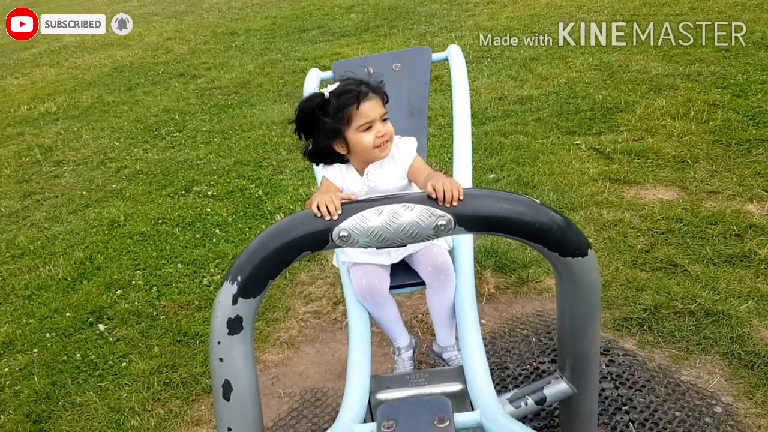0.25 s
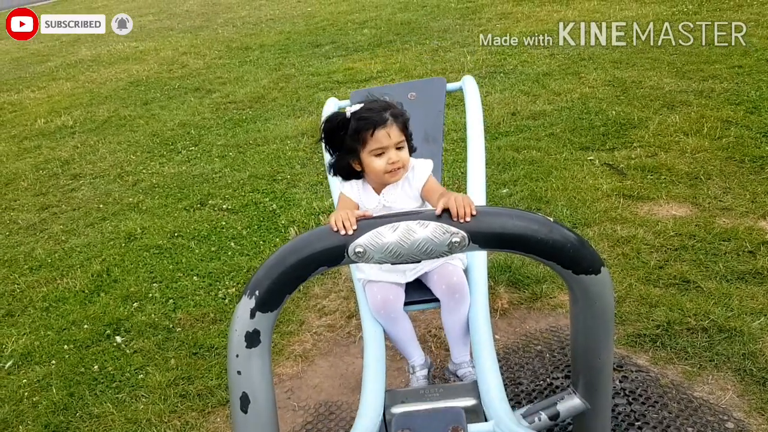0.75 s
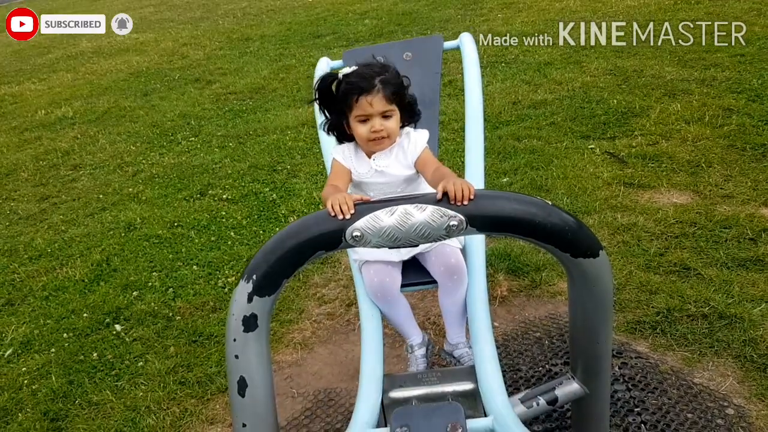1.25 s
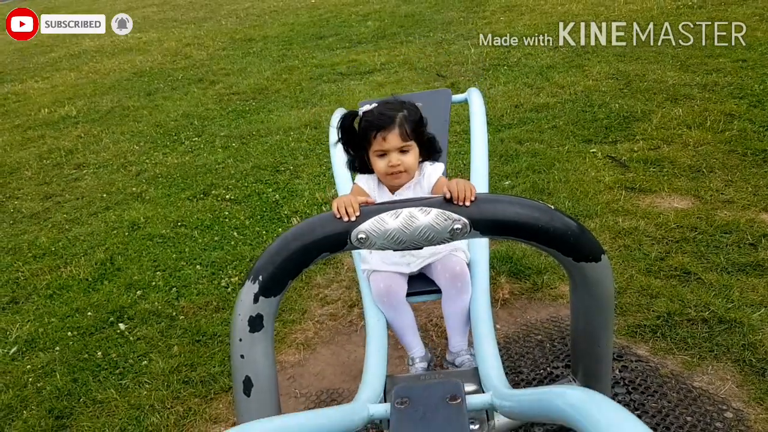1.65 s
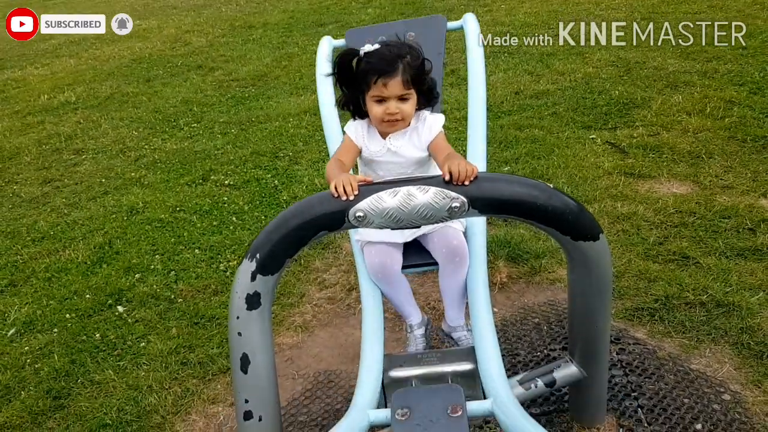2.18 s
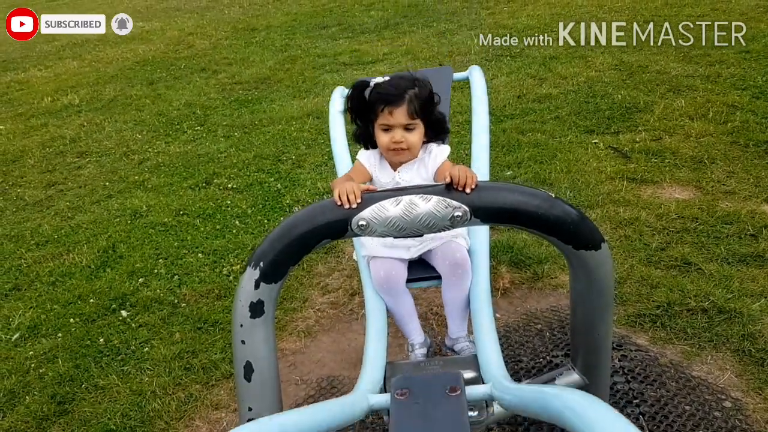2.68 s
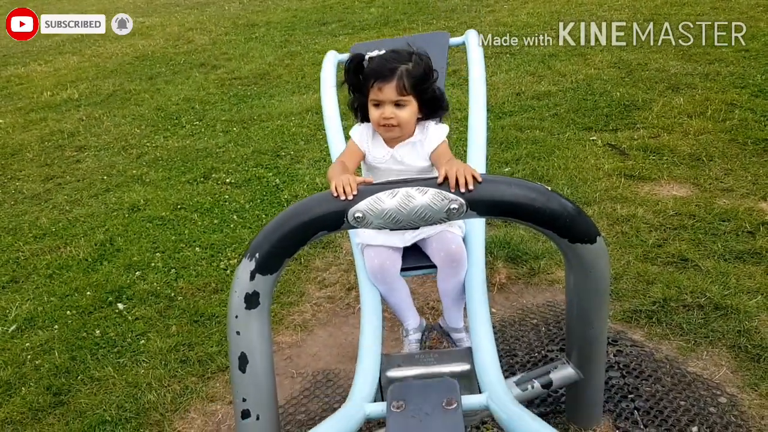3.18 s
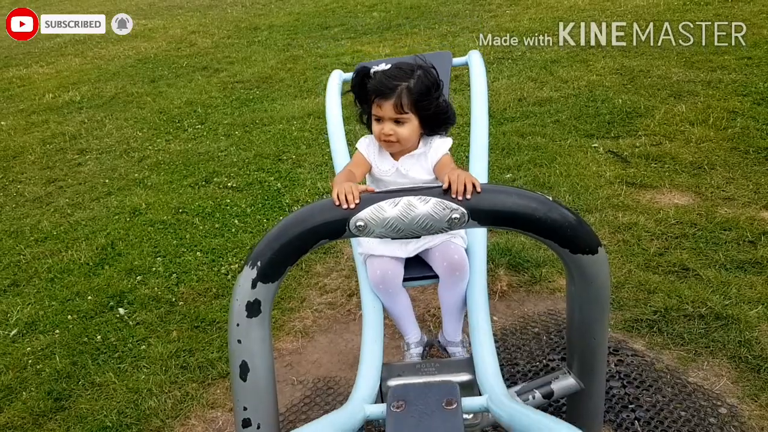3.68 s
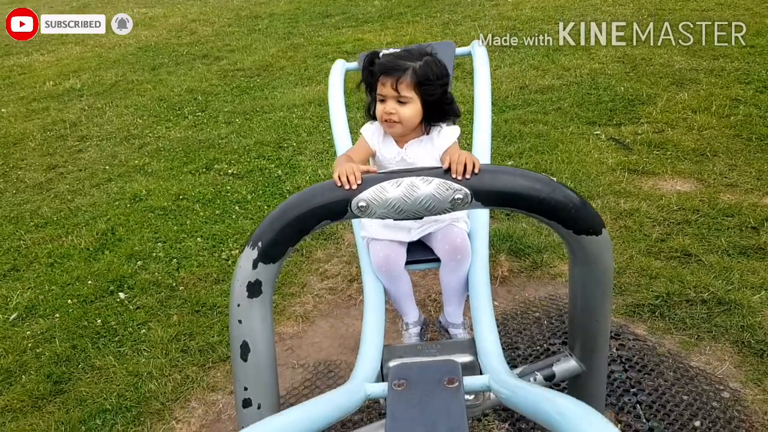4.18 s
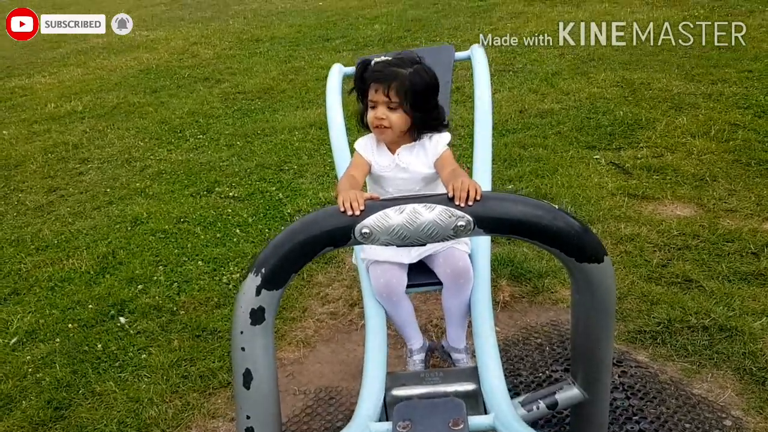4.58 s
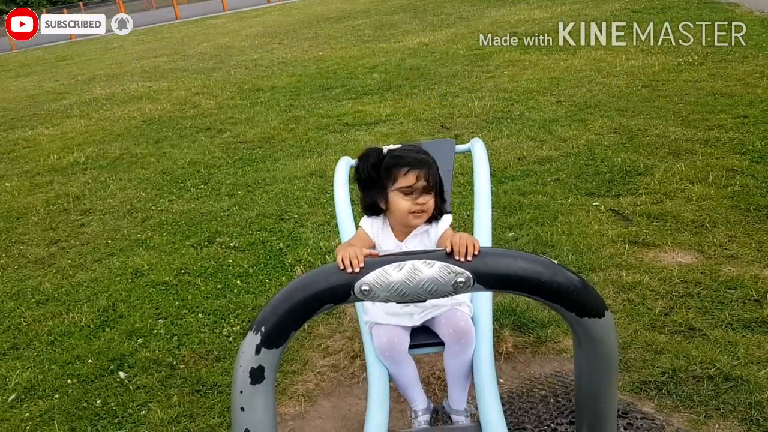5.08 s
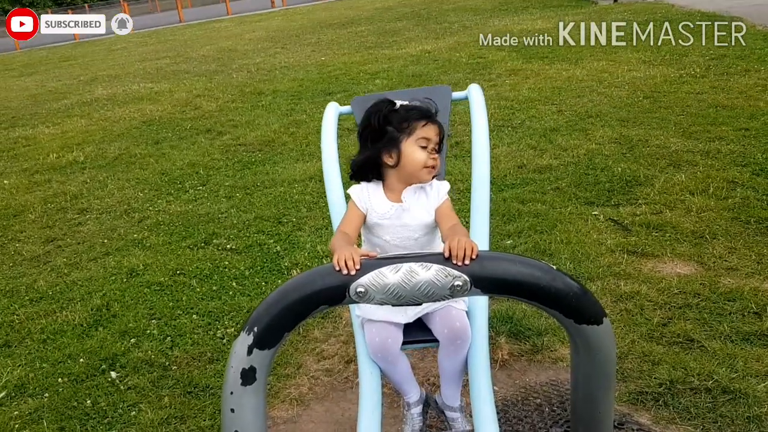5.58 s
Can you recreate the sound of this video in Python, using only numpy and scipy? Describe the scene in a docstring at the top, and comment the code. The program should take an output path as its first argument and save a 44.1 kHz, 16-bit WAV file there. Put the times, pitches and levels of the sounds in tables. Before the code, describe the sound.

High, scraping metallic squeaks repeat in a steady back-and-forth rhythm over a faint open-air hush and soft wind rumble.

```python
"""A dry metal squeak, once each way, from the pivot of a rocking seat on a lawn, close to a phone with two ports.
Stick-slip feeds a few modes of the tube frame until they sing; the chattering contact mixes them and scrapes.
The tubes ring on briefly and the seat ticks faintly.
Light wind puffs on the ports over a faint outdoor hush."""
import sys
import numpy as np
from scipy import signal
from scipy.fft import rfft, irfft
from scipy.io import wavfile
from scipy.ndimage import uniform_filter1d

SR = 44100
rng = np.random.default_rng(int(sys.argv[2]) if len(sys.argv) > 2 else 0)


def to_wav(sig):
    """Store sig (one row per channel, or 1-D mono) as 16-bit WAV at the path in sys.argv[1].

    Samples outside -1..1 are clipped; the rate is SR.
    """
    pcm = np.clip(np.atleast_2d(sig), -1, 1) * 32767
    pcm = np.round(pcm).astype(np.int16)
    wavfile.write(sys.argv[1], SR, pcm.T)  # frames by channels


N = 257984
T = np.arange(N) / SR  # seconds

# Top mode around the last cry of a forward swing: (pitch before [Hz], at the cry [Hz], after it [Hz])
CRY_HZ = (3964, 4126, 4160)
# Middle mode late in either swing: (pitch it falls from [Hz], pitch it falls to [Hz])
MIDDLE_LATE_HZ = (2382, 2304)

SILENT_DB = -120
CATCH_DB_S, LET_GO_DB_S, PETER_DB_S = 3000, 999.5, 805  # dB per s: starting, letting go, dying at the end
LOW_FALL_DB_S = 550  # dB per s
ACCENT_DB, ACCENT_S = 2.5, .035  # the middle mode catches hard, then settles
CONTACT = ("weak", "grit", "chatter")  # layers that follow the contact as a whole


def undb(db):
    """Decibels to gain."""
    return 10 ** (np.asarray(db) / 20)


def unit(x):
    """Scale to rms 1."""
    return x / np.sqrt(np.mean(np.abs(x) ** 2))


def colour(x, points):
    """Shape the spectrum by (Hz, dB) points, straight lines over log frequency, and scale to rms 1."""
    hz, db = np.transpose(points)
    f = np.maximum(np.fft.rfftfreq(N, 1 / SR), 1)
    gain = undb(np.interp(np.log(f), np.log(hz), db, left=-90, right=-90))
    return unit(irfft(rfft(x) * gain, N))


def walk(rate_hz):
    """Smooth random drift of rms 1, drawn every 32 samples."""
    lowpass = signal.butter(2, rate_hz, fs=SR / 32, output="sos")
    coarse = signal.sosfilt(lowpass, rng.standard_normal(N // 32 + 1))
    times = T[::32]
    return np.interp(T, times, unit(coarse)[:len(times)])


def pan(x, db):
    """Place between the ports; db is left minus right."""
    return x * undb(np.array([[1], [-1]]) * db / 2)


def spread(z, db, radians):
    """A phasor sent to both ports with slowly shifting balance and lag, as the seat moves."""
    lag = np.exp(1j * radians * walk(5.22) * np.array([[.5], [-.5]]))
    return (pan(z, db * walk(3.5)) * lag).real


def pivot():
    """Stick-slip at the dry bearing: singing modes, their mixing tones and the scrape."""
    level, pitch = swings()
    modes, lowest = singing_modes(level, pitch)
    singing = sum(spread(mode, 1.8, .45) for mode in modes) + lowest.real
    mixed = undb(level["chatter"]) * mixing_tones(modes)
    return np.sqrt(2) * (singing + mixed) + scrape(level)


def singing_modes(level, pitch):
    """Modes sing clean when far above the scrape, and break up when they are not."""
    # low modes: (low, highest pitch [Hz], lowest mode [Hz])
    low_hz, lowest_hz = (1765, 1387)
    ceiling_hz = 4180  # top pitch at which the low mode reaches its ceiling
    modes = []
    for name, margin_db in (("top", -3), ("high", 5), ("middle", 1)):
        hz, db = pitch[name], level[name]
        waver = undb(db + 2.2 * np.tanh(walk(19)))  # the grip comes and goes
        rough = 0.022 + undb(2 * (level["weak"] + margin_db - db))
        modes.append(waver * sing(hz * (1 + .005 * walk(30)), rough, slip_hz=110))
    # the low mode's pitch rises gently with the top mode's, up to a ceiling
    pulled_hz = low_hz * np.minimum(pitch["top"] / ceiling_hz, 1) ** .5
    modes.append(undb(level["low"]) * sing(pulled_hz, 0.15, slip_hz=30))
    lowest = undb(level["lowest"]) * sing(lowest_hz, .4, slip_hz=29.2)
    return modes, lowest


def sing(hz, rough, slip_hz):
    """A self-excited mode as a turning phasor; uneven slipping shakes its size and phase."""
    rough = np.clip(rough, 0, 1)  # share of the power that is shaken
    uneven = walk(slip_hz) + 1j * walk(slip_hz)
    shake = np.sqrt(1 - rough) + np.sqrt(rough / 2) * uneven
    return shake * np.exp(2j * np.pi * np.cumsum(hz + 0 * T) / SR)


def mixing_tones(modes):
    """Chatter mixes the singing modes; each tone grows with its parents' shares of the motion."""
    # orders of mixing: (multiple of top [1], of high [1], of middle [1], of low [1])
    orders = [(0, 0, 2, 0), (0, 1, 1, 0), (1, 0, 1, 0), (1, 0, 0, 1), (0, 0, 0, 2), (0, 2, -1, 0),
              (0, 1, -1, 0), (0, -1, 2, 0), (0, 2, 0, 0), (2, 0, 0, 0), (0, 3, 0, 0), (3, 0, 0, 0),
              (2, 0, 0, 1), (0, 2, 1, 0), (0, 1, 2, 0)]
    # one per order: level before the share and the chatter level [dB]
    order_db = [-3, 0.5, -6.5, 3.5, -8, -4.5, -17, -4.5, -20, -17, -23.5, -11.5, -3.5, -19, -29.5]
    power = sum(np.abs(mode) ** 2 for mode in modes)
    motion = np.sqrt(uniform_filter1d(power, size=400) + 1e-12)  # over about 9 ms
    log_share, phase = np.log(np.abs(modes) / motion + 1e-9), np.angle(modes)
    mixed = 0
    for order, db in zip(orders, order_db):
        tone = np.exp(0.5 * np.abs(order) @ log_share + 1j * np.array(order) @ phase)
        mixed = mixed + undb(db) * spread(tone, 0.89, 2.7)
    return mixed


def scrape(level):
    """Weaker modes, grit in the bearing, short scuffs as it grips, and a treble rasp."""
    # colour of grit and scuffs: (frequency [Hz], relative level per Hz [dB])
    grit_colour = [(350, -50.5), (600, -24), (1250, -9.5), (1450, -5), (1960, -11), (2400, -0.5),
                   (3240, -13), (3820, -5.5), (6310, -14.5), (6950, -31.5), (9890, -26.5), (14500, -41),
                   (15500, -50.5)]
    # colour of the rasp: (frequency [Hz], relative level per Hz [dB])
    rasp_colour = [(6500, -28), (7600, -2), (8600, -13), (10000, -4), (11500, -8), (12500, -7), (14500, -9),
                   (15500, -19)]
    # the bearing grips: (time, 4 ms ahead of the scuff's peak [s], level before a 7.5 dB lift [dB])
    stops = [(0.4244, -71), (1.0914, -67), (1.5873, -63.5), (2.218, -74), (2.7234, -58), (3.3344, -65),
             (3.823, -64.5), (4.984, -59.5), (5.5374, -56.5)]
    weak_db, grit_db, chatter_db = (level[name] for name in CONTACT)
    caught = weaker_modes()
    # partly shared noise, a little different at each port
    noise = rng.standard_normal(N) + .9 * rng.standard_normal((2, N))
    grit = undb(2.5 * walk(150)) * streaks(noise, depth_db=10.0)
    scuffs = sum(undb(db + 7.5) * np.exp(-((T - s - .004) / 0.01) ** 2) for s, db in stops)
    rasp_db = 0.71 * weak_db + 0.31 * chatter_db - 10.5 + 2.2 * walk(27)
    out = undb(weak_db + 8.5) * unit(caught)
    out = out + (undb(grit_db + 9.5) + scuffs) * colour(grit, grit_colour)
    return out + undb(rasp_db) * colour(grit, rasp_colour)


def weaker_modes():
    """Weaker modes of the frame catch for a moment, glide with the load and let go again."""
    # weaker modes: (frequency [Hz], level relative to each other [dB])
    weak_modes = [(834, -22.5), (1080, -18.5), (1420, -13.5), (1560, -18), (2700, -16), (2950, -22),
                  (3200, -18.5), (3480, -12.5), (4060, 0), (4380, -13), (4540, -4), (4800, -11),
                  (5390, -8.5), (5560, -13.5), (6180, -10.5), (6400, -15.5), (7300, -25.5), (8260, -30.5),
                  (9210, -23.5), (9710, -18), (10300, -17.5), (11100, -25), (12300, -21), (13800, -24.5)]
    load = walk(6)  # shared by all
    caught = 0
    for hz, db in weak_modes:
        catch = undb(db + 11 * np.tanh(1.8 * walk(19.3)))
        tone = sing(hz * (1 + .012 * load + .004 * walk(9)), .2, slip_hz=50)
        caught = caught + catch * spread(tone, 3.3, 1.95)
    return caught


def streaks(x, depth_db):
    """Countless close modes flare up one by one: narrow strips of the noise swell for a moment."""
    z = signal.stft(x, nperseg=1024)[2]
    flare = unit(uniform_filter1d(rng.standard_normal(z.shape[1:]), size=4))
    return signal.istft(z * undb(depth_db * flare), nperseg=1024)[1][:, :N]


def swings():
    """Levels in dB of every layer and pitches of the three gliding modes, from both kinds of swing."""
    db = {name: [] for name in ("top", "high", "middle", "low", "lowest", *CONTACT)}
    hz = {name: [] for name in ("top", "high", "middle")}
    forward_swings(db, hz)
    backward_swings(db, hz)
    level = {name: np.max(traces, axis=0) for name, traces in db.items()}
    pitch = {name: np.interp(T, *np.transpose(sorted(points))) for name, points in hz.items()}
    return level, pitch


def forward_swings(db, hz):
    """Middle mode opens, scrape sets in, pivot stalls, then top and low modes swell to a last cry."""
    # forward swings, levels ahead of accents, flutter and layer trims:
    # (start [s], scrape full [s], stall [s], cry [s],
    #  middle at start [Hz], middle at stall [Hz], high [Hz],
    #  middle at start [dB], at stall [dB], after stall [dB], high at start [dB], at stall [dB],
    #  top [dB], low [dB], lowest [dB], weaker modes [dB], grit [dB], chatter [dB], depth of stall [dB])
    forward = [ (0.206, 0.268, 0.32, 0.42, 2360, 2477, 3743, -37.5, -50, -48, -53, -44.5, -31.5, -40, -39, -49, -56, -47, 10.5),
               (1.326, 1.430, 1.485, 1.578, 2318, 2457, 3773, -48, -49, -46, -48, -42, -30, -41.5, -63.5, -53.5, -58, -45, 4),
               (2.506, 2.559, 2.622, 2.709, 2413, 2412, 3853, -42, -56.5, -40, -61, -44, -31.5, -44.5, -42.5, -50.5, -54, -46.5, 13.5),
               (3.618, 3.682, 3.728, 3.813, 2378, 2506, 3784, -43.5, -58.5, -41.5, -55, -49, -31, -47, -61.5, -50.5, -54, -44.5, 13),
               (4.685, 4.793, 4.875, 4.968, 2488, 2550, 3867, -47.5, -54.5, -48, -54, -47, -30.5, -39.5, -70.5, -54, -62.5, -49.5, 4.5),
               (5.82, 5.900, 5.95, 6.05, 2350, 2517, 3690, -38, -50.5, -45, -61, -50, -30, -50, -65, -53.5, -60, -42, 12),
               ]
    # build-up from the start: (weaker modes [dB], grit [dB], chatter [dB])
    opening_db = (15.5, 24.5, 7.5)
    # change at the cry: (weaker modes [dB], grit [dB], chatter [dB])
    at_cry_db = (2, -4.5, 6.5)
    stall_s, late_sag_db = .012, 9
    dip_hz, dip_s = 60.04, .05  # the high mode starts sharp, then dips
    cry_rise_db_s, low_rise_db_s = 380.5, 300.5  # dB per s
    hold_s, glide_s, low_late_s = 0.0057, .06, .012
    for (start, full, stall, cry, hz0, hz1, high_hz, mid0, mid1, mid2, high0, high1,
         top, low, lowest, *contact, depth) in forward:
        dip = depth * np.exp(-((T - stall) / stall_s) ** 2)
        opening = [(start + .006, mid0 + ACCENT_DB), (start + ACCENT_S, mid0 - ACCENT_DB),
                   (stall - stall_s, mid1)]
        after = [(stall + stall_s, mid2), (cry, mid2 - late_sag_db)]
        db["middle"] += [trace(opening, CATCH_DB_S, LET_GO_DB_S), trace(after, CATCH_DB_S, LET_GO_DB_S)]
        hz["middle"] += [(start, hz0), (full, hz1), (stall, hz1),
                         (stall + stall_s, MIDDLE_LATE_HZ[0]), (cry, MIDDLE_LATE_HZ[1])]
        points = [(start, high0), (stall - .02, high1), (cry - glide_s, high1)]
        db["high"] += [trace(points, CATCH_DB_S, LET_GO_DB_S) - dip]
        hz["high"] += [(start, high_hz + dip_hz), (start + dip_s, high_hz - dip_hz),
                       (stall, high_hz), (cry - glide_s / 2, CRY_HZ[0])]
        points = [(cry - hold_s, top), (cry + hold_s / 2, top)]
        db["top"] += [trace(points, cry_rise_db_s, LET_GO_DB_S)]
        hz["top"] += [(cry - glide_s, CRY_HZ[0]), (cry, CRY_HZ[1]), (cry + glide_s / 2, CRY_HZ[2])]
        db["low"] += [trace([(cry + low_late_s, low)], low_rise_db_s, LOW_FALL_DB_S)]
        db["lowest"] += [trace([(cry, lowest)], low_rise_db_s, LET_GO_DB_S)]
        for name, level, build, change in zip(CONTACT, contact, opening_db, at_cry_db):
            points = [(start, level - build), (full, level), (stall, level), (cry + hold_s, level + change)]
            db[name] += [trace(points, CATCH_DB_S, LET_GO_DB_S) - dip]


def backward_swings(db, hz):
    """The high mode sings, breaks up, hands over to the top mode, and the squeak peters out."""
    # backward swings, levels ahead of accents, flutter and layer trims:
    # (middle starts [s], high catches [s], high loudest [s], scrape full [s], handover [s],
    #  top lets go [s], end [s], middle at start [Hz], high [Hz], top [Hz],
    #  middle at start [dB], at handover [dB], at end [dB], high at catch [dB], loudest [dB],
    #  at handover [dB], top [dB], top near the end [dB], low [dB], lowest [dB],
    #  weaker modes [dB], grit [dB], chatter [dB], scrape builds by [dB], fades by [dB], top early by [s])
    backward = [ (0.819, 0.82, 0.87, 0.93, 1, 1.04, 1.084, 2327, 3837, 4015, -55, -50, -54, -38.5, -30.5, -44.5, -31, -52, -51.5, -60.5, -46, -58, -41.5, 14, 15, .002),
                (1.978, 1.994, 2.070, 2.085, 2.155, 2.192, 2.228, 2497, 3849, 4026, -51, -47, -64.5, -37, -29, -46, -29.5, -42.5, -54.5, -47, -46, -57.5, -41.5, 11, 13, 0.0021),
                (3.120, 3.173, 3.13, 3.216, 3.262, 3.322, 3.340, 2540, 3814, 4028, -50, -47.5, -61, -44, -35, -38.5, -29.5, -46, -54.5, -66, -44.5, -56, -42, 14.5, 11.5, 0.0023),
                (4.232, 4.298, 4.400, 4.325, 4.440, 4.505, 4.570, 2540, 3840, 4045, -49, -57, -63, -41, -34.5, -38.5, -39, -49.5, -59, -77.5, -49.5, -57.5, -43, 16, 16, .08),
                (5.375, 5.330, 5.418, 5.440, 5.487, 5.503, 5.542, 2278, 3860, 4010, -53.5, -43, -68.5, -37, -29, -49, -28, -47.5, -62, -47, -44.5, -62, -40, 21, 17, 0.0018),
                ]
    # share of the build-up: (weaker modes [1], grit [1], chatter [1])
    build_share = (1.1, 0.91, 0.12)
    # share of the fade: (weaker modes [1], grit [1], chatter [1])
    fade_share = (1.13, 1.2, .9)
    glide_hz = 30.06  # the high mode glides up from below its pitch to above it, then settles
    break_s = 0.022  # after its loudest moment the high mode loses half its drop in this time
    for (start, catch, loudest, full, hand, let_go, end, hz0, high_hz, top_hz,
         mid0, mid1, mid2, high0, high1, high2, top, tail, low, lowest,
         *contact, build, fade, early) in backward:
        points = [(start, mid0 + ACCENT_DB), (start + ACCENT_S, mid0 - ACCENT_DB), (hand, mid1), (end, mid2)]
        db["middle"] += [trace(points, CATCH_DB_S, PETER_DB_S)]
        hz["middle"] += [(start, hz0), (hand - .01, MIDDLE_LATE_HZ[0] + 30),
                         (hand, MIDDLE_LATE_HZ[0]), (end, MIDDLE_LATE_HZ[1])]
        points = [(catch, high0), (loudest, high1), (loudest + break_s, (high1 + high2) / 2),
                  (hand - .01, high2)]
        db["high"] += [trace(points, CATCH_DB_S, LET_GO_DB_S)]
        hz["high"] += [(catch, high_hz - glide_hz), (catch + .025, high_hz + glide_hz), (hand, high_hz)]
        points = [(hand - early, top - 4), (hand, top), (let_go, top - 3),
                  (min(let_go + 0.014, end - .002), tail), (end, tail - 3)]
        db["top"] += [trace(points, CATCH_DB_S, PETER_DB_S)]
        hz["top"] += [(hand - early, top_hz - 20), (hand, top_hz), (let_go, top_hz), (end + .02, CRY_HZ[1])]
        points = [(hand + .01, low - 8), (let_go, low), (end, low - 10)]
        db["low"] += [trace(points, LOW_FALL_DB_S, LOW_FALL_DB_S)]
        points = [(hand - .02, lowest - 8), (let_go, lowest), (end, lowest - 10)]
        db["lowest"] += [trace(points, LOW_FALL_DB_S, LOW_FALL_DB_S)]
        first, second = sorted((start, catch))  # the scrape builds once both modes sing
        for name, level, up, down in zip(CONTACT, contact, build_share, fade_share):
            quiet = level - up * build
            points = [(first, quiet), (second + .001, quiet), (full, level), (end, level - down * fade)]
            db[name] += [trace(points, CATCH_DB_S, PETER_DB_S)]


def trace(points, rise_db_s, fall_db_s):
    """A level in dB through (s, dB) points, out of silence and back at the given rates."""
    (s0, db0), (s1, db1) = points[0], points[-1]
    before = (s0 - (db0 - SILENT_DB) / rise_db_s, SILENT_DB)
    after = (s1 + (db1 - SILENT_DB) / fall_db_s, SILENT_DB)
    s, db = np.transpose([before, *points, after])
    return np.interp(T, s, db)


def tubes(squeak):
    """Lightly damped tube modes ring on after each squeak, with a short blur from seat and ground."""
    # ringing modes: (frequency [Hz], time to fall 60 dB [s], level ahead of a gain that grows with it [dB])
    ringing = [(4330, 0.67, -50), (4000, 0.8, -46.5), (2500, 0.36, -41.5), (1765, 0.26, -32)]
    decay = np.log(1000)  # a fall of 60 dB
    rings = 0
    for hz, t60, db in ringing:
        rings = rings + undb(db) * resonate(squeak, hz, decay / (np.pi * t60)) * np.sqrt(60 * t60)
    t = T[:SR // 2]
    tail = np.exp(-decay * t / 0.03) + undb(-28) * np.exp(-decay * t / 0.71)
    blur = rng.standard_normal((2, len(t))) * tail
    flicker = undb(4.5 * walk(20))
    return flicker * rings + undb(-43) * signal.fftconvolve(squeak, blur, axes=1)[:, :N]


def resonate(x, hz, width_hz):
    """One mode, gain 1 at its centre."""
    return signal.lfilter(*signal.iirpeak(hz, hz / width_hz, fs=SR), x)


def ticks():
    """Tiny dry clicks of play in the seat: decaying noise bursts, band-passed."""
    # faint ticks: (time [s], burst level before a 0.5 dB cut and the band-pass [dB])
    clicks = [(5.2012, -65.5), (5.215, -59.5), (5.223, -58)]
    out = np.zeros((2, N))
    for s, db in clicks:
        decay = (T > s) * np.exp(-np.abs(T - s) / 0.0041)
        out += undb(db - 0.5) * decay * rng.standard_normal(N)
    return signal.sosfilt(signal.butter(2, [1500, 8000], "band", fs=SR, output="sos"), out)


def thumps():
    """Strong single eddies hit the ports: about one cycle each."""
    # eddies: (time, 4 ms ahead of the centre [s], envelope peak [dB], frequency [Hz], left minus right [dB])
    eddies = [(0.324, -51, 244, 3), (0.944, -40, 210, 8), (1.384, -36, 67.64, -2), (1.489, -46.5, 64, 9),
              (3.323, -44, 61, 0), (3.526, -44, 61.9, -1), (3.677, -46.5, 62.07, 12),
              (3.844, -41.5, 125.2, -5), (3.868, -33.5, 171, 4), (3.96, -46, 175, 1),
              (4.479, -47.5, 106, 9)]
    out = 0
    for s, db, hz, pan_db in eddies:
        cycles = hz * (T - s - .004)
        cycle = np.exp(-(cycles / .5) ** 2) * np.sin(2 * np.pi * cycles)
        out = out + pan(undb(db) * cycle, pan_db)
    return out


def wind():
    """Eddies burst on the ports: low puffs, partly shared, and a higher rustle, over a steady hush."""
    # wind at the ports: (time [s], rumble before a 2.5 dB lift [dB], rustle before a 5.5 dB lift [dB])
    gusts = [(0.0, -65.5, -64), (0.26, -64.5, -68), (0.33, -53.5, -63), (0.36, -69, -66),
             (0.55, -56.5, -59), (0.65, -64.5, -78), (0.98, -54, -63), (1.32, -57.5, -65),
             (1.37, -49.5, -53), (1.74, -62.5, -69), (2.33, -59.5, -67.5), (2.39, -65, -80),
             (2.85, -62.5, -75.5), (2.98, -77, -85.5), (3.11, -57.5, -62.5), (3.65, -55.5, -69),
             (3.78, -66.5, -59), (3.83, -50.5, -59.5), (4.2, -65.5, -67), (4.48, -56, -63.5),
             (4.61, -69, -72), (4.68, -59, -61.5), (5.25, -65, -80), (5.57, -58, -71.5),
             (5.7, -72.5, -79.5), (5.85, -67.5, -76)]
    # colour of the rumble: (frequency [Hz], relative level per Hz [dB])
    rumble_colour = [(20, -17.5), (40, -4), (65, 2), (130, -1.5), (220, -6), (400, -19), (700, -44)]
    # colour of the rustle: (frequency [Hz], relative level per Hz [dB])
    rustle_colour = [(150, -13.5), (300, -1.5), (600, -7.5), (1000, -11), (1600, -27), (3000, -35)]
    # colour of the outdoor hush: (frequency [Hz], relative level per Hz [dB])
    hush_colour = [(500, -19.5), (900, -13), (1500, -16.5), (2500, -22), (4000, -23), (8000, -29),
                   (15500, -30.5)]
    s, *columns = np.transpose(gusts)
    rumble_db, rustle_db = (np.interp(T, s, column) for column in columns)
    both = walk(26)  # the part of the puffs that the ports share
    puffs_db = [3.9 * walk(3.66) + 7.4 * np.tanh(0.89 * walk(35) + 0.46 * both) for _ in range(2)]
    puffs = undb(puffs_db)
    noise = rng.standard_normal((2, N)) + 0.78 * rng.standard_normal(N)
    rumble = undb(rumble_db + 2.5) * colour(puffs * noise, rumble_colour)
    rustle = undb(rustle_db + 5.5) * colour(puffs * rng.standard_normal((2, N)), rustle_colour)
    hush = undb(-76) * colour(rng.standard_normal((2, N)), hush_colour)
    return pan(rumble, 3.3) + pan(rustle, -1.3) + hush


def scene():
    """The seat reaches the two ports with a balance and lag that vary with frequency; wind on top."""
    # seat at the ports: (frequency [Hz], left minus right [dB], phase by which left leads [rad])
    ports = [(830, -4.5, 1.2), (1350, 2, 2.5), (1690, -0.2, 0.28), (2160, -0.5, 1.6), (2460, 1, 0.61),
             (3380, 1.5, 0.7), (3630, -3, 0.32), (4230, 3.5, -2), (4980, -0.5, -0.34), (5700, -1.5, 0.15),
             (5840, 1, -0.3), (6560, -1.2, -1.52), (8050, -3.5, 0.95), (9400, -1.5, 0.83),
             (12300, -0.5, -2.66)]
    squeak = pivot()
    seat = squeak + tubes(squeak) + ticks()
    hz, pan_db, lead = np.transpose(ports)
    f = np.fft.rfftfreq(N, 1 / SR)
    turn = undb(np.interp(f, hz, pan_db) / 2) * np.exp(.5j * np.interp(f, hz, lead))
    at_ports = irfft(rfft(seat) * np.array([turn, 1 / turn]), N)
    return at_ports + wind() + thumps()


def record(dry):
    """The phone cuts the top: a steep low-pass at 15.6 kHz."""
    return signal.sosfilt(signal.ellip(10, .2, 80, 15600, fs=SR, output="sos"), dry)


dry = scene()
out = record(dry)
to_wav(out)
```